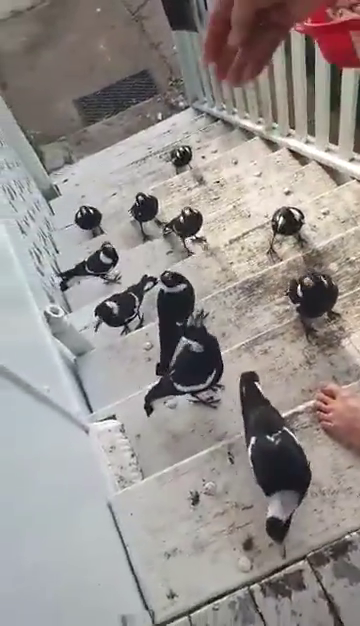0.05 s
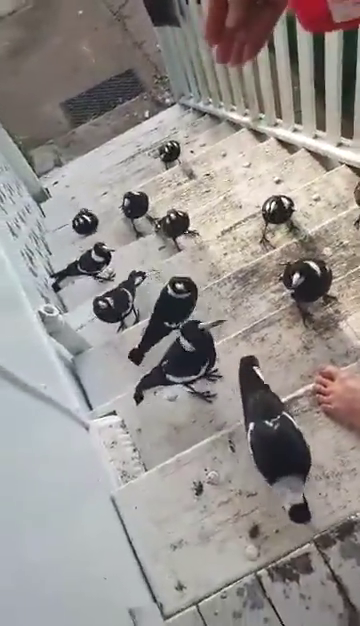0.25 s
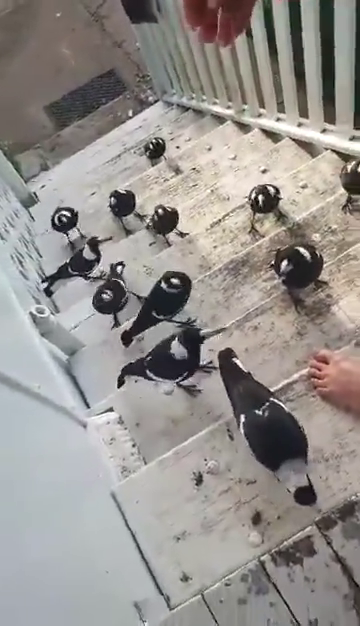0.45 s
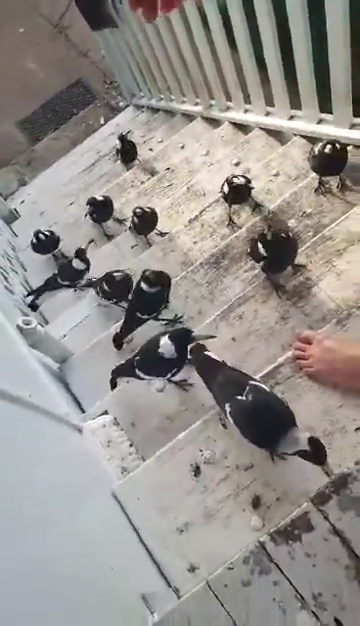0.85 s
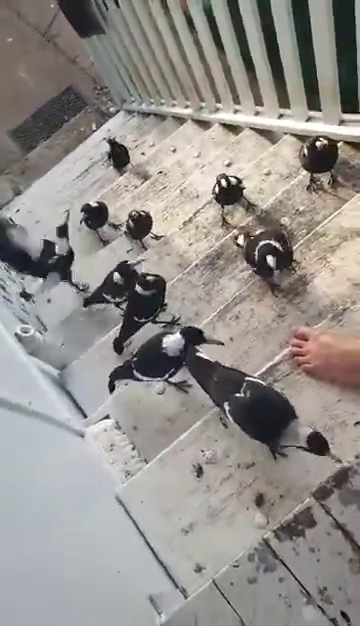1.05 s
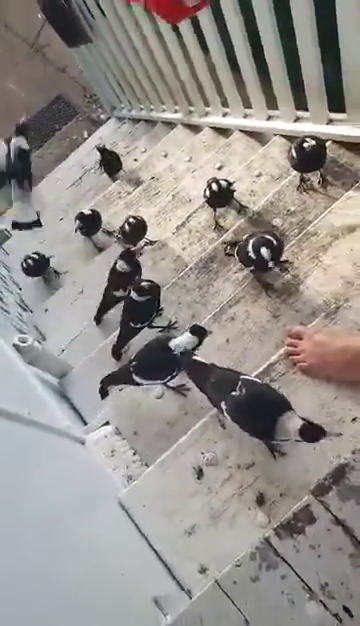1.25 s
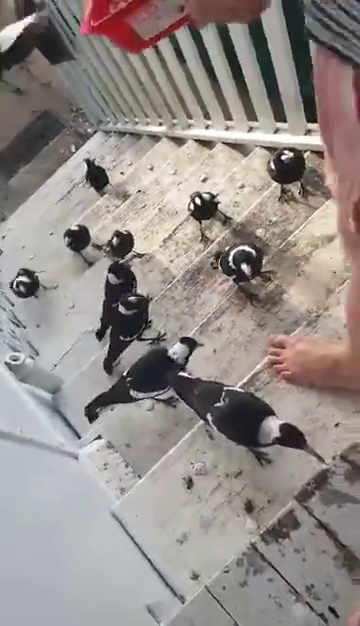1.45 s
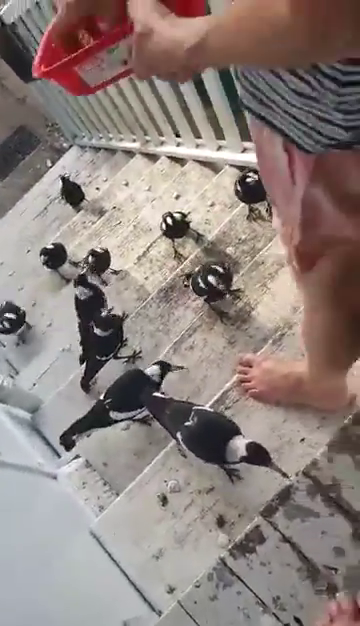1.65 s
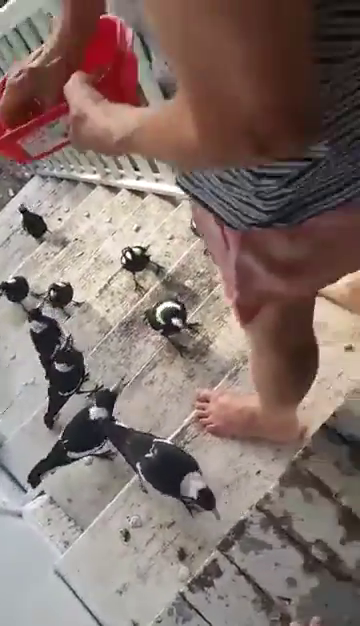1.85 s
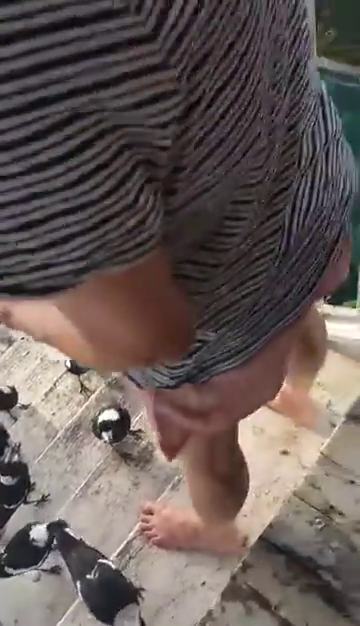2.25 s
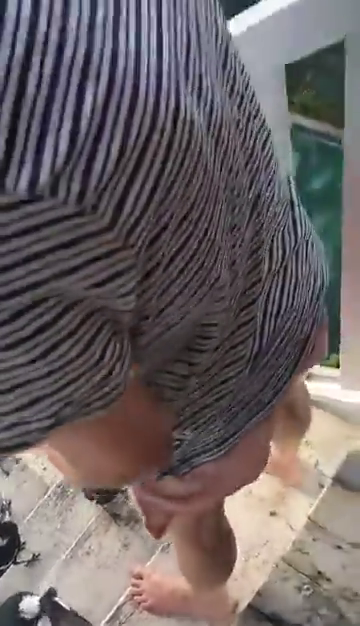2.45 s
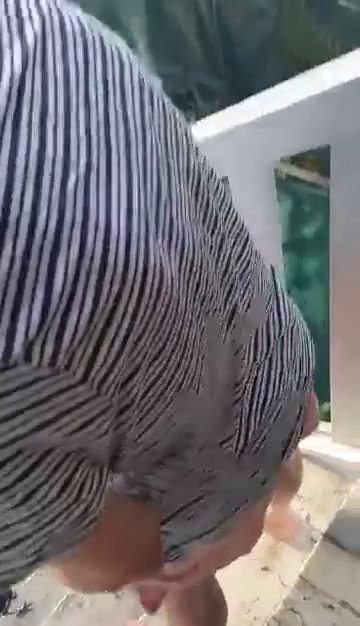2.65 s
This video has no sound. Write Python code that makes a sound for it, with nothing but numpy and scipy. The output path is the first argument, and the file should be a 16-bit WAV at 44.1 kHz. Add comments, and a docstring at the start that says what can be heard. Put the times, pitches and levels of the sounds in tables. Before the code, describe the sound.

Magpies beg on outdoor steps. After a brief chirp, harsh falling wails follow one another, some clear and some buzzy, with short growls, a squawk and two faint taps between. The calls sound close, over a low background hum.

```python
"""A brief chirp over a low hum, then magpies beg for food on outdoor steps, one harsh falling wail
after another, with short growls, a squawk and two small taps between. Each bird sings with the two
sides of its syrinx: one clean tone, two tones that beat, or a tone chopped into a buzz.
Overtones and hiss leave through the open beak; steps and railings reflect them."""
import sys
import numpy as np
from scipy import signal
from scipy.fft import rfft, irfft, next_fast_len
from scipy.io import wavfile
from scipy.ndimage import uniform_filter1d

SR = 44100
rng = np.random.default_rng(int(sys.argv[2]) if len(sys.argv) > 2 else 0)


def file_out(sig):
    """Save sig as 16-bit WAV at sys.argv[1]."""
    # one column per channel
    cols = np.atleast_2d(sig).T
    # limit, then scale
    lim = np.clip(cols, -1, 1)
    pcm = np.round(lim * 32767).astype(np.int16)
    wavfile.write(sys.argv[1], SR, pcm)


N = 119070
FADE_S = 0.0074


def amp(db):
    """Decibels to gain."""
    return 10 ** (np.asarray(db) / 20)


def unit(x):
    """Scales to rms 1."""
    return x / np.sqrt(np.mean(abs(x) ** 2) + 1e-20)


def colour(x, points, peaks=()):
    """Filters by (freq_hz, gain_db) points, plus (freq_hz, lift_db) peaks or gaps 5 % wide."""
    size = next_fast_len(len(x) + 2048)
    freq_hz, gain_db = np.transpose(points)
    bins_hz = np.fft.rfftfreq(size, 1 / SR) + 1
    lift_db = sum(db * np.exp(-((bins_hz / hz - 1) / 0.05) ** 2) for hz, db in peaks)
    gain = amp(np.interp(np.log(bins_hz), np.log(freq_hz + 1), gain_db) + lift_db)
    return irfft(rfft(x, size) * gain, size)[:len(x)]


def drift(t, hz):
    """Smooth random wander of rms 1, up to about hz."""
    bins_hz = np.fft.rfftfreq(len(t), 1 / SR)
    lowpass = np.exp(-(bins_hz / hz) ** 2) * (bins_hz > 0)
    return unit(irfft(rfft(rng.standard_normal(len(t))) * lowpass, len(t)))


def placed(t, sound):
    """Puts a sound at its time in the scene."""
    out = np.zeros(N)
    part = out[max(round(t[0] * SR), 0):][:len(t)]
    part += sound[:len(part)]
    return out


def span(*curves):
    """Sample times covering the curves and their fades."""
    start_s = max(min(rows[0][0] for rows in curves) - FADE_S, 0)
    end_s = max(rows[-1][0] for rows in curves) + FADE_S
    return np.arange(start_s, end_s, 1 / SR)


def level(t, rows):
    """Gain along a level curve, faded at both ends."""
    time_s, level_db = np.transpose(rows)[[0, -1]]
    fade = np.clip(np.minimum(t - time_s[0], time_s[-1] - t) / FADE_S + 1, 0, 1)
    return amp(np.interp(t, time_s, level_db)) * fade


def tone(t, rows, waver):
    """One sung tone: a phasor with slightly unsteady pitch."""
    time_s, pitch_hz, _ = np.transpose(rows)
    unsteady_hz = np.interp(t, time_s, pitch_hz) * (1 + waver * drift(t, hz=58.9))
    return level(t, rows) * np.exp(2j * np.pi * np.cumsum(unsteady_hz) / SR)


def buzz(t, rows, pulse_hz, depth, rough):
    """A tone chopped into uneven pulses that slow through the call."""
    sag_per_s, swell_db = 0.688, 2
    rate_hz = pulse_hz * np.exp(-sag_per_s * (t - rows[0][0])) * (1 + 0.15 * drift(t, pulse_hz))
    gate = np.exp(depth * np.cos(2 * np.pi * np.cumsum(rate_hz) / SR))
    gate *= amp(swell_db * drift(t, pulse_hz))
    return tone(t, rows, waver=0.0052) * unit(gate) * np.exp(1j * rough * drift(t, pulse_hz))


# throat and beak, rough calls: freq_hz, gain_db
THROAT = [(600, -23), (1500, 4.5), (2300, -6.5), (3200, -3), (4800, 0), (5700, -7), (7200, -2),
          (9000, -17.5), (10800, -6), (13000, -21)]
# harmonics 2 to 5 against the higher ones: gain_db
HARMONIC_DB = [0.34, 2.2, 2.31, 1]


def call(t, sides, rasp_gain, peaks, jitter, hiss, tilt_db=0, throat=THROAT, wobble=0):
    """Syrinx tones plus rasp: overtones, sum tones and hiss that flare in the throat's resonances."""
    voice = sum(sides)
    envelope = uniform_filter1d(abs(voice), size=900) + 2e-3
    weights = amp(np.pad(HARMONIC_DB, (0, 7)))
    shake = np.exp(1j * (jitter * drift(t, hz=466) + wobble))
    overtones = 0
    for source in [voice] + (sides if len(sides) > 1 else []):
        phasor = source / (abs(source) + 1e-9) * shake
        harmonics = sum(weight * phasor ** k for k, weight in enumerate(weights, 2)).real
        overtones += abs(source) / envelope * harmonics
    pulse = (abs(voice) + 2e-3) / envelope
    breath = hiss * unit(pulse * rng.standard_normal(len(t)))
    rasp = colour(unit(overtones) + breath, throat, peaks)
    rasp = colour(rasp, [(4000, 0), (12000, tilt_db)])
    return np.sqrt(2) * voice.real + rasp_gain * unit(rasp)


# overtone colour, one peak and one narrow gap: freq_hz, lift_db
RATTLE_COLOUR = [(3850, 5), (5550, -15.5)]


def rattle(rows, pulse_hz, depth, rough, rasp_db, peaks=RATTLE_COLOUR):
    """A short pulsed note whose overtones follow its level."""
    t = span(rows)
    sides = [buzz(t, rows, pulse_hz, depth, rough)]
    rasp_gain = level(t, rows) * amp(rasp_db)
    return placed(t, call(t, sides, rasp_gain, peaks, jitter=.1, hiss=.45, tilt_db=-2.5))


# noise spectra: freq_hz, gain_db
RUMBLE = [(25, -12), (52, 0.5), (95, -0.2), (130, -9), (180, -7), (350, -11.5), (600, -20), (1200, -39)]
AIR = [(300, -34.5), (600, 11), (1100, 15.5), (2000, -7.5), (4500, 4.5), (9000, -55), (13000, -35)]
# hum bands: pitch_hz, width_hz, level_db
HUM = [(48, 4.6, -63), (170, 3.04, -55.5)]


def background():
    """A wavering hum, low rumble and faint outdoor air."""
    t = np.arange(N) / SR
    hum = 0
    for pitch_hz, width_hz, level_db in HUM:
        phase = 2 * np.pi * pitch_hz * t
        hum += amp(level_db) * (drift(t, width_hz) * np.cos(phase) + drift(t, width_hz) * np.sin(phase))
    rumble = amp(-48) * unit(colour(rng.standard_normal(N), RUMBLE))
    air = amp(-58) * unit(colour(rng.standard_normal(N), AIR))
    return hum + rumble + air


# syrinx, one curve per note: time_s, pitch_hz, level_db
CHIRPS = [
    [(0, 1624, -40.5), (.045, 1620, -62)],
    [(1.185, 1566, -51), (1.205, 1614, -35), (1.235, 1680, -65)],
    [(2.625, 2610, -58.5), (2.675, 2614, -65)],
    [(2.605, 1142, -56), (2.635, 1203, -49), (2.70, 945, -41.5)],
]
UPSLURS = [
    [(.035, 1825, -42), (.085, 2020, -40.5), (.10, 2115, -44)],
    [(1.24, 1850, -42), (1.285, 1986, -37)],
]
# throat resonances: freq_hz, lift_db
UPSLUR_PEAKS = [(4000, 9.3), (6150, 18)]


def flock_chirps():
    """Faint chirps and rising, buzzy notes from the rest of the flock."""
    chirps = sum(rattle(rows, pulse_hz=115, depth=.23, rough=.98, rasp_db=-24.5, peaks=[])
                 for rows in CHIRPS)
    upslurs = sum(rattle(rows, pulse_hz=108.5, depth=1, rough=.45, rasp_db=-12, peaks=UPSLUR_PEAKS)
                  for rows in UPSLURS)
    return chirps + upslurs


# syrinx sides: time_s, pitch_hz, level_db
SPLIT_LOW = [(0.109, 1479, -55.5), (0.157, 1408, -39.5), (0.212, 1283, -38.5), (0.237, 1271, -31.5),
             (0.289, 1216, -24.5), (0.31, 1226, -37.5), (0.321, 1206, -26), (0.343, 1168, -33),
             (0.438, 1141, -50.5)]
SPLIT_HIGH = [(0.109, 1874, -53.5), (0.145, 1822, -38.5), (.19, 1752, -40), (0.24, 1684, -34.5),
              (0.309, 1688, -45.5), (0.391, 1590, -46.5)]
# overtones and hiss: time_s, level_db
SPLIT_RASP = [(.10, -46.5), (.22, -45.5), (.28, -42.5), (.41, -49.5)]
# throat resonances: freq_hz, lift_db
SPLIT_PEAKS = [(4900, 10), (5550, 6)]


def split_wail():
    """Two tones far apart slide down; the lower one's fourth harmonic whistles in a resonance."""
    t = span(SPLIT_LOW, SPLIT_HIGH, SPLIT_RASP)
    sides = [tone(t, SPLIT_LOW, waver=0.0037), tone(t, SPLIT_HIGH, waver=0.0065)]
    return placed(t, call(t, sides, level(t, SPLIT_RASP), SPLIT_PEAKS, jitter=.035, hiss=.4, tilt_db=4))


# syrinx sides: time_s, pitch_hz, level_db
BUZZ_HIGH = [(0.386, 1591, -36.5), (0.461, 1547, -27), (0.522, 1471, -33), (0.6, 1399, -37.5),
             (0.718, 1304, -39.5)]
BUZZ_UNDER = [(0.458, 1418, -26.5), (0.532, 1315, -29.5), (.62, 1198, -27.5), (0.717, 1130, -36.5)]
# overtones and hiss: time_s, level_db
BUZZ_RASP = [(.38, -50.5), (.46, -39.5), (.54, -44.5), (.66, -43.5), (.73, -60)]
# throat resonances: freq_hz, lift_db
BUZZ_PEAKS = [(3150, 4), (4700, 9), (5720, 11)]


def buzzing_wail():
    """One side buzzes in deep pulses and carries the overtones; the other slides down beneath it."""
    t = span(BUZZ_HIGH, BUZZ_RASP)
    sides = [buzz(t, BUZZ_HIGH, pulse_hz=140, depth=1, rough=.3)]
    under = np.sqrt(2) * tone(t, BUZZ_UNDER, waver=0.036).real
    return placed(t, under + call(t, sides, level(t, BUZZ_RASP), BUZZ_PEAKS, jitter=.12, hiss=.25))


# wail as heard: time_s, pitch_hz, level_db; reflections briefly cancel it near 0.86 s
CLEAN_TONE = [(.70, 1450, -43.5), (.73, 1422, -29.5), (.775, 1383, -26), (.834, 1338, -18),
              (.856, 1314, -33), (.885, 1292, -15), (.96, 1248, -18), (1.01, 1233, -18.5),
              (1.056, 1194, -17), (1.072, 1183, -35.5)]
# closing rattle: time_s, pitch_hz, level_db
CLEAN_TAIL = [(1.06, 1181, -30.5), (1.125, 1031, -30), (1.185, 1011, -32.5), (1.22, 989, -45)]
# overtones and hiss: time_s, level_db
CLEAN_RASP = [(.73, -61), (.80, -50), (0.858, -37), (.95, -38.5), (1.029, -34.5), (1.10, -42.5)]
# throat and beak: freq_hz, gain_db
CLEAN_THROAT = [(1800, -29.5), (2550, -17), (3800, -5.5), (5100, 3.5), (6100, -20), (7300, -4.5),
                (8900, -19), (10200, -21.5), (13000, -18)]


def clean_wail():
    """A loud pure tone that breaks into a rattle at its end."""
    t = span(CLEAN_TONE, CLEAN_RASP)
    tones = [tone(t, CLEAN_TONE, waver=0.0024)]
    wail = call(t, tones, level(t, CLEAN_RASP), peaks=[], jitter=0, hiss=0.0083,
                tilt_db=-3.5, throat=CLEAN_THROAT)
    return placed(t, wail) + rattle(CLEAN_TAIL, pulse_hz=91.7, depth=.79, rough=.234, rasp_db=-24.5)


# taps on the steps: start_s, level_db, pitch_hz, width_hz, decay_s
TAPS = [(1.231, -42, 436, 116, 0.018), (2.329, -28, 6670, 3000, 0.0008)]


def taps():
    """One dull and one sharp tap, each a decaying band of noise."""
    t = np.arange(4096) / SR
    out = np.zeros(N)
    for start_s, level_db, pitch_hz, width_hz, decay_s in TAPS:
        band = np.sqrt(2) * drift(t, width_hz) * np.cos(2 * np.pi * pitch_hz * t)
        out += placed(start_s + t, amp(level_db) * np.exp(-t / decay_s) * band)
    return out


# syrinx sides: time_s, pitch_hz, level_db
SQUAWK_LOW = [(1.30, 1348, -49), (1.35, 1332, -45)]
SQUAWK_HIGH = [(1.30, 1590, -53), (1.36, 1500, -49)]
# throat resonances: freq_hz, lift_db
SQUAWK_PEAKS = [(2680, 14), (6700, 10)]


def squawk():
    """A brief reedy note on both sides, its overtones louder than its fundamentals."""
    t = span(SQUAWK_LOW, SQUAWK_HIGH)
    sides = [tone(t, SQUAWK_LOW, waver=.004), tone(t, SQUAWK_HIGH, waver=.004)]
    rasp_gain = level(t, SQUAWK_LOW) * amp(5)
    return placed(t, call(t, sides, rasp_gain, SQUAWK_PEAKS, jitter=.03, hiss=.25))


# syrinx sides: time_s, pitch_hz, level_db
HARSH_TONE = [(1.349, 1340, -49.5), (1.388, 1320, -34), (1.472, 1265, -32), (1.53, 1210, -34.5),
              (1.589, 1220, -28), (1.636, 1090, -41), (1.703, 1072, -28.5), (1.752, 1065, -41)]
HARSH_BUZZ = [(1.351, 1560, -42.5), (1.391, 1490, -37.5), (1.471, 1400, -29.5), (1.629, 1205, -32.5),
              (1.689, 1150, -33.5), (1.741, 1080, -41)]
# overtones and hiss: time_s, level_db
HARSH_RASP = [(1.2, -34), (1.37, -45.5), (1.5, -39), (1.69, -47.5), (1.76, -67)]
# throat resonances: freq_hz, lift_db
HARSH_PEAKS = [(3500, 9), (5330, 11)]


def harsh_wail():
    """Hiss leads in; one side sings a falling tone while the other buzzes."""
    t = span(HARSH_TONE, HARSH_BUZZ, HARSH_RASP)
    sides = [tone(t, HARSH_TONE, waver=0.0065), buzz(t, HARSH_BUZZ, pulse_hz=155, depth=.99, rough=.08)]
    wail = call(t, sides, level(t, HARSH_RASP), HARSH_PEAKS, jitter=.09, hiss=.28, tilt_db=5.5)
    return placed(t, wail)


# syrinx: time_s, pitch_hz, level_db
SHORT_GROWL = [(1.70, 825, -43), (1.74, 786.6, -36), (1.81, 782, -37.5), (1.87, 680, -51.5)]
LONG_GROWL = [(2.15, 853, -45.5), (2.21, 775, -32), (2.31, 747.5, -31), (2.42, 798.6, -35)]


def growls():
    """Two low, rough rattles from the flock."""
    return (rattle(SHORT_GROWL, pulse_hz=110.8, depth=.85, rough=1, rasp_db=-18.5)
            + rattle(LONG_GROWL, pulse_hz=104.87, depth=.54, rough=.62, rasp_db=-20))


# syrinx tones: time_s, pitch_hz, level_db
BEAT_LOW = [(1.822, 1085, -41.5), (1.916, 1106, -33.5), (1.959, 1083, -49), (1.998, 1087, -19),
            (2.04, 1072, -23), (2.12, 1089, -20), (2.21, 1077, -24.5), (2.238, 1035, -44)]
BEAT_HIGH = [(1.768, 1106, -43.5), (1.809, 1138, -34), (1.863, 1159, -33.5), (1.951, 1174, -26),
             (2.042, 1148, -23.5), (2.131, 1154, -24), (2.185, 1192, -33)]
BEAT_UNDER = [(1.838, 843, -46.5), (1.96, 822, -41.5), (2.038, 841, -43), (2.169, 850, -51)]
# overtones and hiss: time_s, level_db
BEAT_RASP = [(1.79, -54), (1.97, -40), (2.13, -38.5), (2.24, -53)]
# overtone colour, bright peaks and a narrow gap near 5.8 kHz: freq_hz, lift_db
BEAT_COLOUR = [(3330, 6), (4950, 9), (5480, 15), (5830, -14), (6450, 8)]


def beating_wail():
    """Two close tones beat above a faint lower one; coupling adds combination tones and sidebands."""
    t = span(BEAT_LOW, BEAT_HIGH, BEAT_RASP)
    coupling, low_share = .25, .6
    low, high = tone(t, BEAT_LOW, waver=.001), tone(t, BEAT_HIGH, waver=.001)
    under = tone(t, BEAT_UNDER, waver=.002)
    high_phasor = high / (abs(high) + 1e-6)
    combinations = (amp(-8) * high_phasor ** 2 * under.conj()
                    + amp(-14.5) * under ** 2 / (abs(under) + 1e-6)
                    + amp(-16) * high_phasor * under)
    wobble = coupling * np.sin(np.angle(high * under.conj()))
    reedy = call(t, [high + low_share * low], level(t, BEAT_RASP), BEAT_COLOUR,
                 jitter=.005, hiss=.02, wobble=wobble)
    pure = np.sqrt(2) * ((1 - low_share) * low + under)
    return placed(t, reedy + (pure + combinations).real)


# syrinx: time_s, pitch_hz, level_db
LAST_WAIL = [(2.365, 1057, -32), (2.385, 1046, -32), (2.425, 986, -26.5), (2.46, 914, -32),
             (2.49, 877, -38.5)]


def last_wail():
    """A brief falling note with shallow pulses."""
    return rattle(LAST_WAIL, pulse_hz=93, depth=.15, rough=.59, rasp_db=-26.5)


# scatter from steps, wall and railings: freq_hz, gain_db
SCATTER = [(1200, 1.1), (3000, 12.03), (10000, 11.9)]
# scatter per microphone: left_db, right_db
SCATTER_DB = [-10, 2.5]


def reflections(x, channel):
    """Direct sound, quick scatter from steps and railings, and a thin tail from the yard."""
    scatter_t60_s, yard_t60_s, right_lag_s = .06, .5, .00036
    t = np.arange(SR // 2) / SR
    near, far = (rng.standard_normal(len(t)) * amp(-60 * t / t60_s) * np.minimum(t / 0.01, 1)
                 for t60_s in (scatter_t60_s, yard_t60_s))
    response = amp(SCATTER_DB[channel]) * colour(near / np.linalg.norm(near), SCATTER)
    response += amp(-16) * far / np.linalg.norm(far)
    response[round(channel * right_lag_s * SR)] += 1  # direct path
    return signal.fftconvolve(x, response)[:N]


# background level: time_s, gain_db
BACKGROUND_LEVEL = [(0.7, -1), (1.0, -3.78)]


def scene():
    """The flock on the steps, in stereo, over a background that drops slightly."""
    flock = (flock_chirps() + split_wail() + buzzing_wail() + clean_wail() + taps()
             + squawk() + harsh_wail() + growls() + beating_wail() + last_wail())
    shared = background()
    bed = np.array([shared, shared + .5 * background()])
    bed_gain = amp(np.interp(np.arange(N) / SR, *np.transpose(BACKGROUND_LEVEL)))
    return np.array([reflections(flock, 0), reflections(flock, 1)]) + bed_gain * bed


# microphone responses: freq_hz, gain_db
LEFT_MIC = [(30, -0.5), (1200, 5), (10000, 0.32)]
RIGHT_MIC = [(1200, -7.5), (3000, -21.5), (5000, -23), (7500, -31.5), (9500, -10.5), (13000, -10.5)]


def record(dry):
    """The left microphone hears far more than the right; both are band-limited."""
    cutoff_hz = 13200
    heard = np.array([colour(dry[0], LEFT_MIC), colour(dry[1], RIGHT_MIC)])
    lowpass = signal.firwin(511, cutoff_hz, window=("kaiser", 9), fs=SR)
    return signal.oaconvolve(heard, lowpass[None], "same")


dry = scene()
out = record(dry)
file_out(out)
```